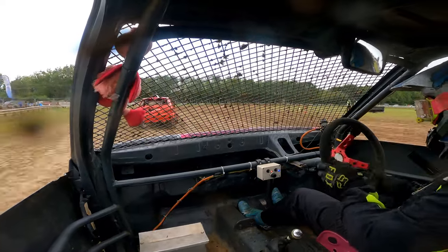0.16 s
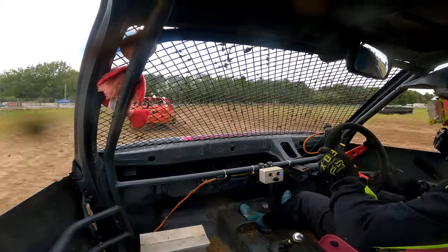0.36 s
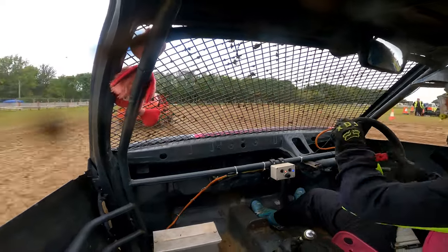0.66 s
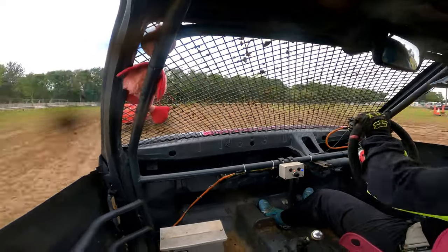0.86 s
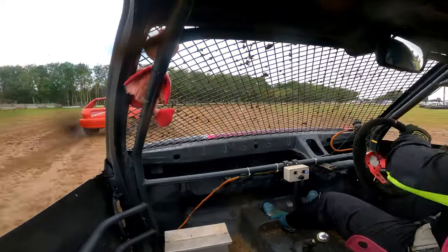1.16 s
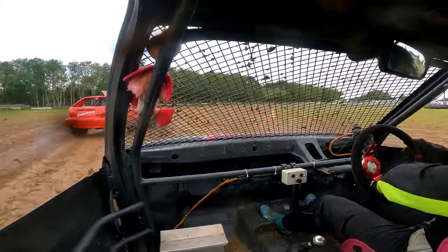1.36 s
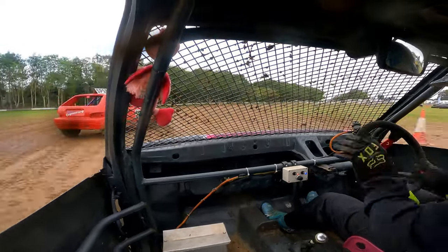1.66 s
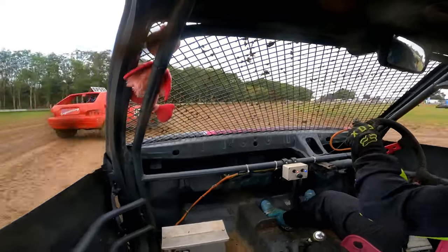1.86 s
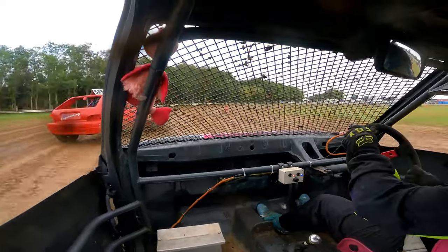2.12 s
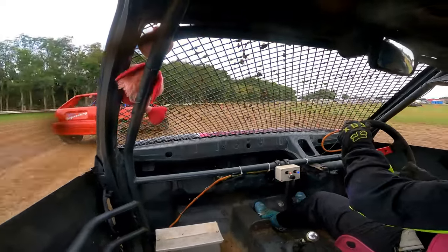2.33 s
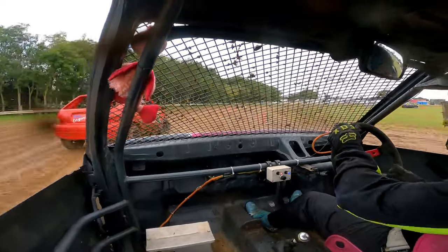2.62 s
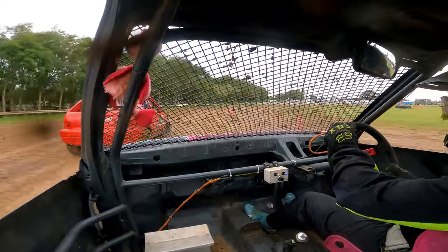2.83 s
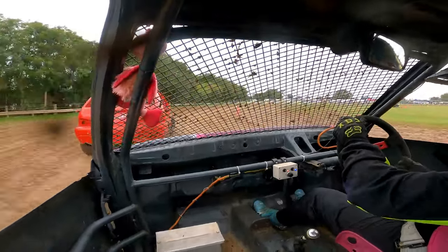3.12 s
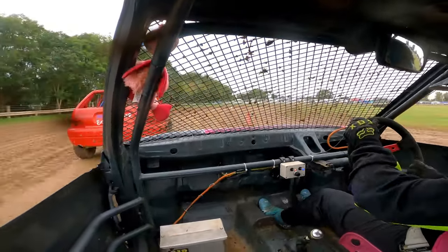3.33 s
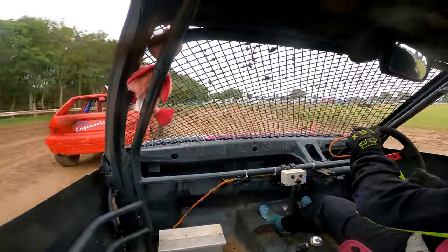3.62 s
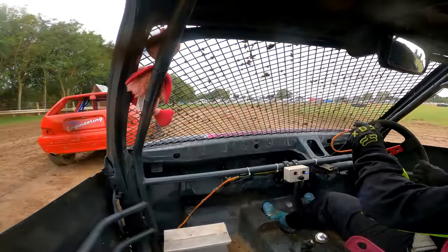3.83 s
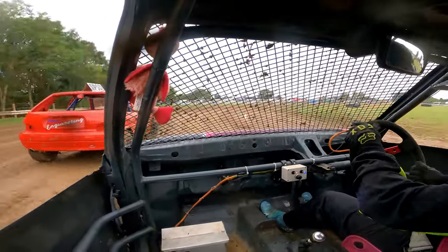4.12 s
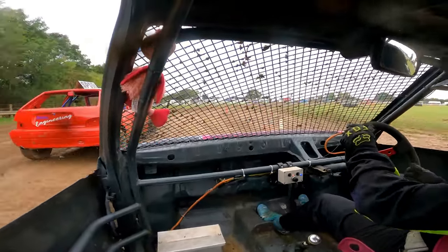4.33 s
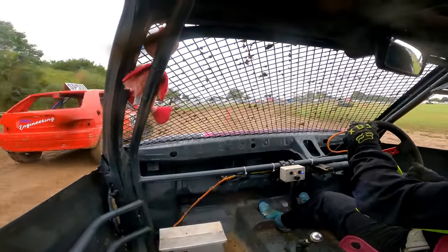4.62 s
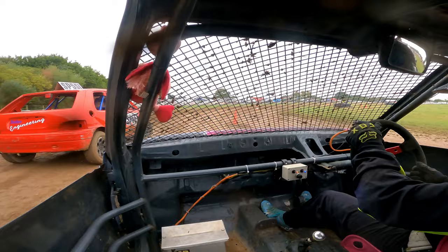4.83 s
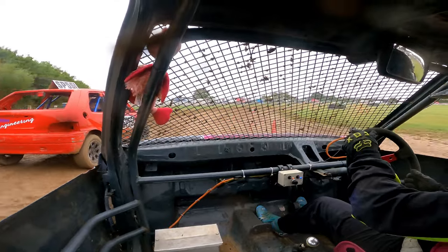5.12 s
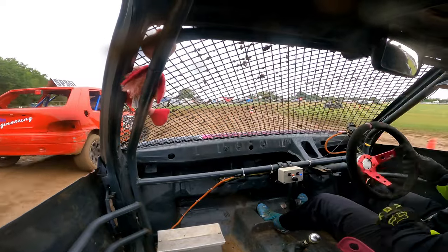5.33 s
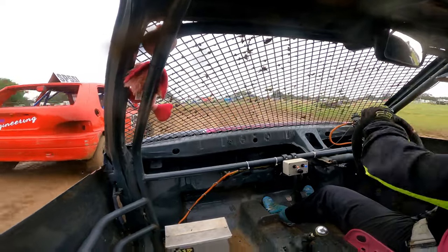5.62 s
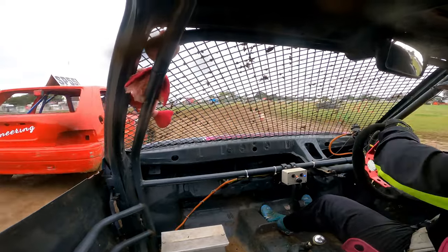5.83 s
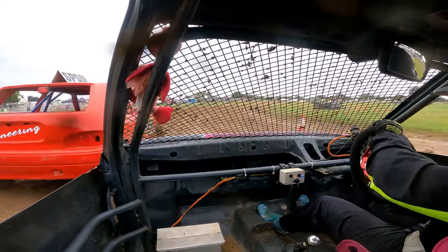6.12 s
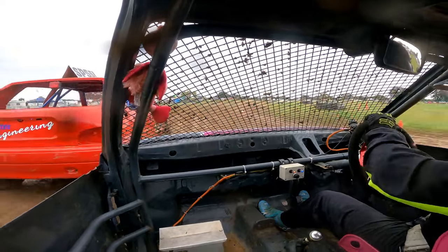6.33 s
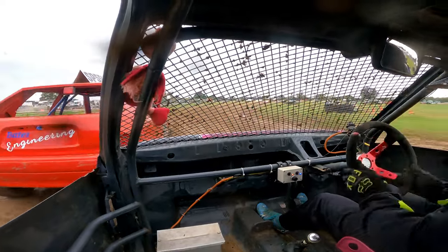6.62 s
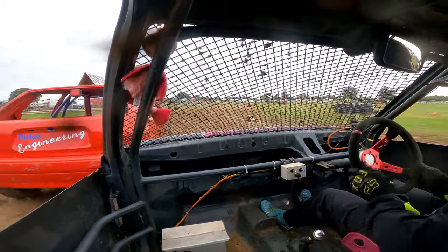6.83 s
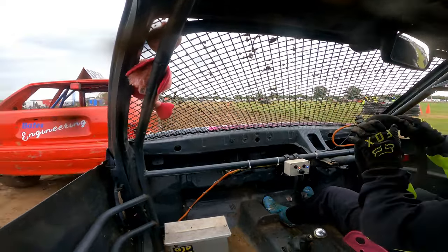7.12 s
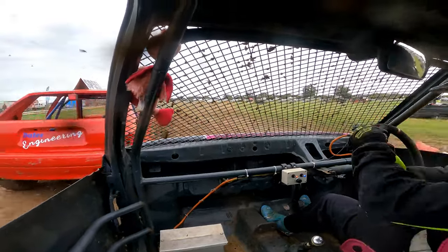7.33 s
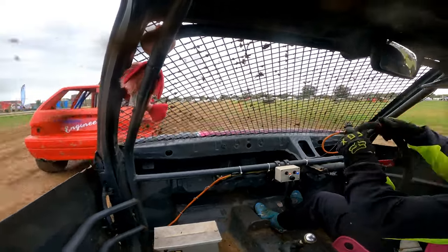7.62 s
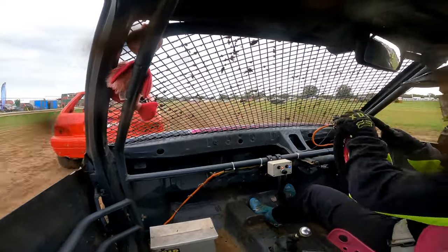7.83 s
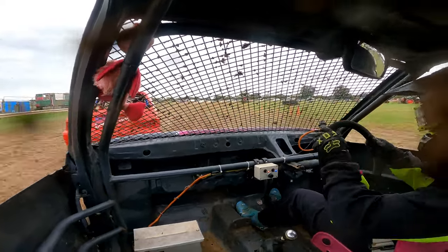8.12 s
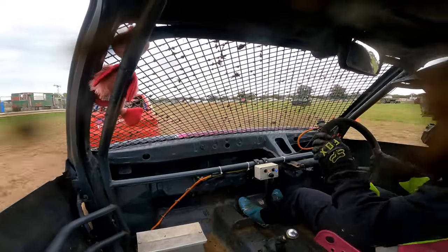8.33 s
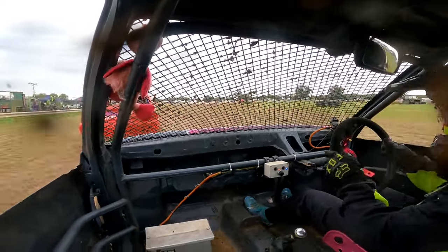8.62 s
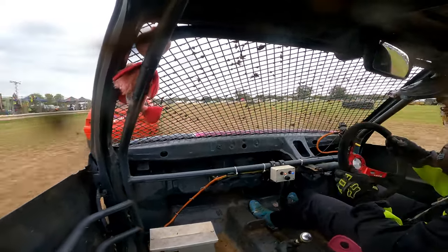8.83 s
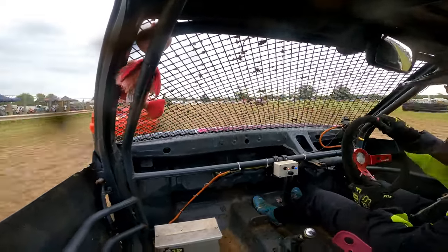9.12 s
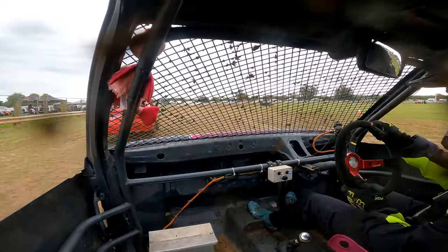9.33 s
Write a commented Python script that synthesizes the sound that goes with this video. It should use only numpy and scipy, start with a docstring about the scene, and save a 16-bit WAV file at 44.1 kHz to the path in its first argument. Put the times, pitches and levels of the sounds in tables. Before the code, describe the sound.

Heard from inside the bare cabin of a car racing on dirt, a loud engine drones and surges with only small changes in revs. The shell booms and the floor rumbles under a fast, irregular clatter close to the boxed-in microphone. Grit ticks and dirt hisses against the body. Thin panel tones and an on-and-off gear whine grow more present in the second half, with thicker grit near the end.

```python
"""Race car cockpit on a dirt oval

A stripped car at full throttle, heard by a small microphone in a closed housing on the cage.
The engine fires roughly into the bare shell, which booms; ruts shake the body, loose panels rattle and
sing, the gears whine and flying grit ticks on the metal. A gain control evens out the swells and the
peaks are rounded."""
import sys
import numpy as np
from scipy import signal
from scipy.fft import rfft, irfft, next_fast_len
from scipy.io import wavfile
from scipy.ndimage import uniform_filter1d

SR = 44100
rng = np.random.default_rng(int(sys.argv[2]) if len(sys.argv) > 2 else 0)


def materialize(psi):
    """Save the field psi as 16-bit PCM at rate SR to the path in sys.argv[1].

    A 1-D psi becomes a single channel; in a 2-D psi each row is a channel.
    """
    bounded = np.clip(np.atleast_2d(psi).T, -1, 1)
    quanta = np.round(bounded * 32767).astype(np.int16)
    wavfile.write(sys.argv[1], SR, quanta)


N = 417186
TIME = np.arange(N) / SR

# How rough the track is. Each row: time in seconds, usual rattle level in dB, dirt spray level in dB.
TRACK_SURFACE = [(0, -18.5, -42.5), (.4, -21, -43.5), (.95, -11.5, -42.5), (1.4, -35.5, -47),
                 (2.03, -16, -42), (2.3, -33, -47.5), (2.9, -30, -45.5), (3.5, -18.5, -45),
                 (4.4, -36, -45.5), (4.55, -5, -44.5), (4.75, -30, -47), (5.0, -18.5, -45),
                 (5.5, -24.5, -47.5), (6.0, -13, -44), (6.45, -28, -47), (6.9, -6.5, -42),
                 (7.5, -22.5, -41.5), (8.2, -25, -43.5), (8.85, -17.5, -43.5), (9.46, -31, -42)]
# The airy hiss of dust on metal. Each row: frequency in Hz, relative level in dB.
DUST_SPECTRUM = [(5000, -14.5), (7000, -1.5), (8500, -2.5), (10000, -7.5), (12000, -16), (15000, -30)]


def engine():
    """The firing tone trembles and surges over a low growl; the roar above puffs with every firing."""
    # The revs. Each row: time in seconds, firings per second, tone level in dB.
    revs = [(0, 202, -15.5), (.25, 180, -16.5), (.42, 179, -11), (1.0, 179, -18.5), (1.3, 181, -14.5),
            (1.7, 165, -12), (2.05, 161, -29), (2.22, 164, -12.5), (2.5, 171, -8.5), (2.9, 184, -18),
            (3.2, 177, -15), (3.6, 184, -13), (3.95, 193, -16), (4.45, 177, -17), (4.75, 183, -15.5),
            (5.1, 186, -14.5), (5.35, 211, -22), (5.7, 177, -10.5), (6.1, 191, -20), (6.55, 187, -12.5),
            (7.2, 192, -18), (7.6, 203, -14), (7.8, 186, -20), (8.05, 176, -16), (8.4, 183, -15.5),
            (8.7, 189, -17), (9.1, 186, -15.5), (9.46, 195, -19.5)]
    # The growl's fader moves. Each row: time in seconds, level in dB.
    growl_levels = [(0, -26.5), (.5, -29), (1.2, -24), (1.4, -28), (1.9, -24), (2.5, -28.5), (3.0, -25),
                    (3.8, -26.5), (4.5, -25.5), (5.5, -27), (6.5, -27.5), (7.15, -22), (7.6, -26.5),
                    (8.2, -28), (8.7, -24), (9.46, -31)]
    # The growl's low-mid body. Each row: frequency in Hz, relative level in dB.
    growl_spectrum = [(200, -7), (260, -0.5), (340, -6), (450, -2), (570, 0), (700, -4.5), (820, -10),
                      (950, -18)]
    # Engine and wind roar through the housing. Each row: frequency in Hz, relative level in dB.
    roar_spectrum = [(600, -31), (800, -11.5), (1000, 0), (1420, -3.5), (1520, -13), (2000, -21.5),
                     (3000, -37), (7000, -58.5), (9500, -71), (12000, -86)]
    firing_hz, tone_db = in_time(revs)
    phase = 2 * np.pi * np.cumsum(firing_hz + 4.54 * drift(14.02) + 3.996 * drift(3.978)) / SR
    tone = from_db(tone_db + 2.6 * drift(16)) * np.sin(phase)
    roar_db = -25.5 + 1.7 * np.cos(phase) + 1.2 * drift(19) + 1.4 * drift(27)
    growl_db = in_time(growl_levels)[0] - 2 + 1.3 * drift(7) + 2.4 * drift(20)
    growl = from_db(growl_db) * coloured(growl_spectrum)
    return tone + growl + from_db(roar_db) * coloured(roar_spectrum)


def shell_boom():
    """The bare shell booms in its lowest mode, trembling in pitch and strength."""
    # The boom. Each row: time in seconds, pitch in Hz, level in dB.
    boom = [(0, 46.21, -19), (.55, 43.91, -18.5), (1.2, 38.08, -14), (1.55, 44.58, -18.5),
            (2.0, 39.02, -15), (2.3, 41, -17.5), (3.2, 37.79, -15), (4.0, 39.68, -13), (4.7, 38.86, -16.5),
            (5.1, 37.36, -15.5), (5.6, 40.62, -18), (6.05, 38.09, -16), (6.45, 41.77, -23.5),
            (7.1, 34.92, -16), (7.55, 34.3, -20), (7.8, 35.03, -16), (8.2, 35.46, -23.5),
            (9.2, 36.77, -18.5), (9.46, 39.2, -36)]
    hz, db = in_time(boom)
    phase = 2 * np.pi * np.cumsum(hz + 2.25 * drift(2.975) + 5.02 * drift(25)) / SR
    return from_db(db) * rms_one(from_db(2.5 * drift(14)) * np.sin(phase))


def rut_rumble():
    """Ruts rumble up through the floor."""
    # The rumble's fader moves. Each row: time in seconds, level in dB.
    levels = [(0, -13.5), (.8, -14), (2.0, -14), (3.2, -14), (4.2, -13.5), (5.5, -14), (6.5, -14),
              (7.15, -12.5), (7.7, -13), (8.3, -15), (8.8, -13.5), (9.46, -15.5)]
    # Its bass weight. Each row: frequency in Hz, relative level in dB.
    spectrum = [(15, -11.5), (28, -8), (60, -2), (110, -2), (150, 1), (185, -0.5), (215, -4.5), (250, -13),
                (340, -22.5), (600, -24.5)]
    return from_db(in_time(levels)[0] + 0.25 * drift(4.1)) * coloured(spectrum)


def loose_rattle():
    """A loose part bounces at an uneven rate; every knock thuds and rings the housing."""
    # The hardest knocks. Each row: time in seconds, strength in dB, ring focus in Hz.
    hard_knocks = [(0.024, -12.5, 1050), (0.395, -16.5, 1040), (0.476, -16, 1030), (0.599, -14.5, 982),
                   (0.639, -13, 982), (0.667, -14, 1090), (0.745, -11, 1052), (0.778, -10, 1080),
                   (0.794, -9.5, 913), (0.845, -11, 915), (0.911, -8.5, 1040), (0.941, -14, 960),
                   (0.959, -21, 1048), (1.022, -13, 982), (1.044, -10, 1096), (1.078, -8.5, 1056),
                   (1.195, -11, 1020), (1.208, -9, 1080), (1.224, -8, 1020), (1.236, -12, 958),
                   (1.289, -17, 1010), (1.326, -13.5, 903), (1.491, -13, 902), (1.514, -13, 1200),
                   (1.598, -9, 952), (1.625, -9, 1085), (1.649, -11, 1150), (1.695, -15, 1050),
                   (1.712, -14, 934), (1.74, -9.5, 1097), (1.76, -8, 1040), (1.849, -13.5, 1110),
                   (1.905, -14, 912), (1.916, -13, 872), (1.926, -16, 1050), (1.939, -10.5, 1090),
                   (1.962, -9, 1047), (1.992, -10, 1040), (2.005, -10, 1030), (2.02, -8, 1030),
                   (2.031, -5.5, 1110), (2.059, -8.5, 1160), (2.08, -14, 940), (2.091, -9.5, 996),
                   (2.105, -9, 990), (2.124, -15, 1203), (2.138, -13, 1030), (2.207, -16, 885),
                   (2.4, -25, 1180), (2.482, -10.5, 999), (2.562, -9, 1010), (2.638, -8, 1020),
                   (2.723, -10, 977), (2.739, -8, 1113), (2.846, -12, 1037), (2.86, -9, 1080),
                   (2.949, -19, 1100), (2.977, -11.5, 1130), (3.048, -13, 1020), (3.065, -11.5, 1060),
                   (3.096, -16, 1110), (3.121, -6, 1062), (3.189, -12.5, 999), (3.227, -11, 1042),
                   (3.243, -10, 1000), (3.264, -15, 899), (3.337, -11.5, 993), (3.359, -10, 1100),
                   (3.384, -8.5, 945), (3.439, -21, 1090), (3.467, -11, 1040), (3.477, -11, 1110),
                   (3.494, -8, 1120), (3.508, -12, 1130), (3.525, -7, 1000), (3.54, -16, 985),
                   (3.554, -16, 1057), (3.581, -13, 912), (3.613, -18, 1022), (3.628, -12, 1056),
                   (3.644, -6.5, 1080), (3.656, -7, 988), (3.685, -8.5, 1020), (3.802, -15.5, 1200),
                   (3.843, -10.5, 1060), (3.971, -14, 1030), (4.021, -14.5, 1080), (4.064, -14, 996),
                   (4.081, -19, 1000), (4.1, -11.5, 934), (4.126, -10, 1118), (4.148, -17, 1040),
                   (4.173, -13, 1120), (4.204, -9, 1025), (4.248, -13, 996), (4.279, -12, 1090),
                   (4.333, -11, 1020), (4.362, -9, 1100), (4.458, -19, 1210), (4.474, -14, 1088),
                   (4.487, -8.5, 1038), (4.504, -9, 1055), (4.53, -10, 990), (4.604, -9, 1030),
                   (4.614, -9, 1110), (4.689, -13, 1060), (4.78, -21, 1110), (4.876, -5, 1005),
                   (4.888, -10, 956), (4.906, -11, 1060), (5.003, -13, 979), (5.057, -10, 1080),
                   (5.068, -12, 944), (5.084, -7.5, 1050), (5.239, -19, 1170), (5.298, -21, 1060),
                   (5.334, -16, 1246), (5.527, -14, 980.6), (5.606, -16, 1040), (5.727, -14.5, 1097),
                   (5.784, -9, 991), (5.856, -13, 961), (5.88, -13, 1099), (6.008, -11, 1159),
                   (6.038, -6.5, 1039), (6.052, -10, 953), (6.068, -13, 1063), (6.099, -12, 1075),
                   (6.18, -20.5, 1040), (6.238, -16, 1154), (6.289, -14.5, 1040), (6.662, -12, 1110),
                   (6.717, -11, 1140), (6.771, -8, 1190), (6.795, -11, 941), (6.86, -18, 1042),
                   (6.933, -11, 920), (6.984, -5, 1102), (7.007, -10.5, 1030), (7.096, -6, 1048),
                   (7.127, -11, 922), (7.154, -11, 1051), (7.25, -11, 1060), (7.356, -10, 1090),
                   (7.414, -15, 931), (7.517, -9, 1166), (7.628, -12, 969), (7.725, -5, 1080),
                   (7.753, -5.5, 1110), (7.784, -11, 998), (7.795, -10.5, 1100), (7.856, -11, 982),
                   (7.897, -14, 1195), (7.952, -9, 898), (7.965, -10, 1160), (8.0, -18, 1240),
                   (8.076, -13, 992), (8.292, -16, 988), (8.327, -16, 1247), (8.47, -18, 1246),
                   (8.541, -16, 1230), (8.608, -9, 892.5), (8.677, -10.5, 1184), (8.701, -10, 1157),
                   (8.711, -12, 1006), (8.734, -9, 1090), (8.745, -12, 1202), (8.773, -10, 1040),
                   (8.995, -12, 1072), (9.033, -12.5, 1010), (9.276, -9, 1026), (9.287, -10, 880)]
    # The housing's modes. Each row: pitch in Hz, relative level in dB, seconds to fade by 60 dB.
    housing_modes = [(970, -7, 0.09), (1004, -6.5, 0.026), (1054, -2.5, 0.019), (1105, -6, 0.022),
                     (1206, -5, 0.024), (1210, -4.5, 0.057), (1720, 10, 0.034), (2260, 10.5, .01),
                     (3150, 19.5, .015)]
    bounces_per_s, clearance_s, bounce_cap_db = 72, .011, -15
    hard_s, hard_db, hard_hz = np.transpose(hard_knocks)
    bounce_count = np.cumsum(bounces_per_s * from_db(3 * drift(30) + 2.5 * drift(5))) / SR
    bounces = np.flatnonzero(np.diff(np.floor(bounce_count)))
    gap_s = np.abs(bounces[:, None] / SR - hard_s).min(axis=1)
    bounces = bounces[gap_s > clearance_s]   # leave room around each hard knock
    bounce_hz = 1016 * np.exp(.07 * rng.standard_normal(N)[bounces])
    bounce_db = in_time(TRACK_SURFACE)[0] + 0.92 * drift(7.2) + 2.8 * rng.standard_normal(N)
    at = np.r_[bounces, (hard_s * SR).astype(int)]
    db = np.r_[np.minimum(bounce_db[bounces], bounce_cap_db), hard_db]
    hz = np.r_[bounce_hz, hard_hz]
    ring = strike(at, db - 8.5, housing_modes, focus_hz=hz, fall_db=27, rise_db=27, spread_db=5.5)
    mount = signal.butter(1, [820, 1500], "band", fs=SR, output="sos")   # passes the ring on softly
    return signal.sosfilt(mount, ring) + thuds(at, db - 1.5, hz)


def thuds(at, db, hz, rise_s=.0014):
    """Each knock is a few cycles that swell and die within milliseconds."""
    t = np.arange(700) / SR
    burst = t / rise_s * np.exp(1 - t / rise_s) * np.sin(2 * np.pi * hz[:, None] * t)
    out = np.zeros(N + len(t))
    np.add.at(out, at[:, None] + np.arange(len(t)), from_db(db)[:, None] * burst)
    return out[:N]


def floor_pan():
    """The shaken floor pan sings on one note."""
    # The note's fader moves. Each row: time in seconds, level in dB.
    levels = [(0, -32.5), (.3, -31), (1.0, -37.5), (2.5, -42), (2.75, -29), (3.0, -31), (3.3, -40),
              (3.75, -26), (4.3, -29.5), (4.7, -27), (6.0, -25.5), (6.7, -27), (6.9, -33), (7.3, -27.5),
              (7.7, -38.5), (8.0, -29.5), (9.46, -43)]
    return from_db(in_time(levels)[0] + 0.83 * drift(6.1)) * singing(576.2, width_hz=20, steady=.59)


def door_skin():
    """The shaken door skin sings, its note gliding as the body twists."""
    # The door's note. Each row: time in seconds, pitch in Hz, level in dB.
    glide = [(0, 1633, -31.5), (.3, 1667, -39), (.6, 1701, -34.5), (.73, 1676, -45), (.85, 1744, -34),
             (1.0, 1665, -37), (1.15, 1715, -32), (1.3, 1625, -43), (1.42, 1700, -39), (1.5, 1657, -52),
             (1.6, 1663, -48), (2.15, 1658, -47.5), (2.55, 1667, -55), (2.63, 1682, -31.5),
             (2.72, 1673, -42), (2.78, 1703, -48), (2.85, 1659, -32), (3.05, 1677, -40), (3.25, 1644, -45),
             (4.3, 1642, -54), (4.45, 1665, -37), (4.65, 1643, -50), (4.78, 1636, -31.5), (4.95, 1596, -39),
             (5.35, 1600, -34), (5.5, 1634, -34), (5.77, 1655, -28), (5.87, 1670, -37.5),
             (6.01, 1654, -23.5), (6.12, 1593, -38), (6.3, 1655, -32.5), (6.6, 1695, -31.5),
             (6.72, 1683, -42), (6.85, 1670, -32.5), (7.08, 1732, -35.5), (7.3, 1659, -38),
             (7.5, 1667, -36), (7.61, 1668, -30), (7.7, 1677, -42.5), (8.4, 1640, -41), (8.54, 1630, -29.5),
             (8.93, 1665, -38), (9.05, 1664, -27), (9.14, 1647, -27), (9.3, 1650, -40), (9.4, 1738, -31.5),
             (9.46, 1715, -24)]
    hz, db = in_time(glide)
    return from_db(db + drift(9)) * singing(hz, width_hz=36, steady=.85)


def gear_whine():
    """Meshing teeth make a rough tone that comes and goes with the load on the wheels."""
    # Spells under load. Each row: start in seconds, length in seconds, pitch in Hz, level in dB.
    under_load = [(.245, 0.02, 1430, -23), (.36, 0.29, 1435, -32), (.74, 0.084, 1395, -23.5),
                  (2.1, 0.56, 1400, -49), (2.75, 0.17, 1375, -47), (3.1, 0.44, 1355, -38.5),
                  (4.8, .2, 1324, -29.5), (5.1, 0.24, 1291, -28), (5.5, 0.16, 1351, -29.5),
                  (5.75, 0.2, 1410, -28), (5.95, 0.095, 1385, -30), (6.43, 0.16, 1393, -28),
                  (6.73, 0.066, 1430, -22.5), (7.03, 0.078, 1432, -26.5), (7.45, 0.31, 1276, -29.5),
                  (7.9, 0.27, 1295, -28), (8.1, 0.23, 1435, -30), (8.4, 0.17, 1255, -26.5),
                  (8.7, 0.12, 1280, -27.5), (8.95, .1, 1394, -30.5), (9.12, 0.17, 1454, -27),
                  (9.35, 0.11, 1419, -31)]
    hz, gain = spells(under_load)
    return gain * from_db(0.84 * drift(16)) * singing(hz + 14 * drift(5), width_hz=40, steady=.69)


def panel_drone():
    """A narrow panel tone swells once near the end."""
    # The swell. Its row: start in seconds, length in seconds, pitch in Hz, level in dB.
    swell = [(9.2, 0.22, 893, -30)]
    hz, gain = spells(swell)
    return gain * singing(hz, width_hz=5.3, steady=.9)


def flying_grit():
    """Stones crack on sheet metal and scatter weaker chips; fine grains tick, and a few hit fittings."""
    # Stone hits. Each row: time in seconds, strength in dB, focus in Hz, fall above it in dB per octave.
    stones = [(0.073, -45, 4500, 20), (0.1007, -52, 7500, 8), (0.1751, -54, 6300, 2),
              (0.1901, -52, 8900, -3), (0.2025, -56, 7500, 12), (0.2438, -43, 5300, 12),
              (0.3033, -39, 6300, 18), (0.3532, -41, 4500, -9), (0.3672, -61, 7500, 15),
              (0.3876, -52, 8900, 6), (0.4355, -43, 4500, 3), (0.6375, -41, 4500, 3),
              (0.667, -20, 3800, 14), (0.7502, -48, 5300, 14), (0.8326, -25, 1900, 12),
              (0.9088, -46, 4500, 11), (1.078, -30, 2700, 28), (1.102, -35, 3800, 37),
              (1.2083, -25, 2300, 29), (1.2237, -35, 2700, 20), (1.2387, -23, 2700, 21),
              (1.2531, -46, 5300, 33), (1.5789, -24.5, 3200, 24), (1.7165, -48, 5300, 21),
              (1.9625, -43, 5300, 37), (2.0309, -31, 2700, 27), (2.0703, -47, 4500, 28),
              (2.0912, -24, 3200, 37), (2.1247, -45, 3800, 20), (2.3212, -38, 2700, 21),
              (2.5208, -24, 3800, 34), (2.7378, -40, 3200, 20), (2.8555, -29, 2300, 16),
              (2.9398, -41, 5300, 37), (3.0481, -35, 2700, 36), (3.1054, -22, 2700, 35),
              (3.1209, -44, 5300, 38), (3.3514, -33, 1900, 20), (3.3828, -32, 2700, 25),
              (3.5075, -20, 2700, 24), (3.524, -35, 3200, 25), (3.541, -46, 4500, 16.5),
              (3.6278, -29, 2700, 28), (3.6437, -35, 3200, 24.5), (3.6572, -26, 2700, 24),
              (3.8014, -53, 6300, 32), (4.0089, -38, 2700, 13), (4.0987, -22, 2700, 32),
              (4.1865, -24, 3200, 42), (4.2039, -35, 3200, 30), (4.2783, -39, 4500, 41),
              (4.3616, -49, 5300, 38), (4.4828, -23, 1900, 24), (4.6155, -22, 2700, 43),
              (4.631, -54, 6300, 12), (4.8904, -25, 3200, 40), (4.9058, -34, 3200, 23),
              (5.068, -35, 3800, 40), (5.0834, -27, 3200, 22), (5.6896, -34, 4500, 35),
              (5.8552, -59, 7500, 19), (7.0944, -54, 4500, 12), (7.1112, -48, 5300, 10),
              (7.2001, -23, 2700, 33), (7.5189, -12.5, 1900, 12), (7.5379, -34, 2300, 8),
              (7.6381, -31, 5300, 38), (7.6895, -40, 6300, 39), (7.7224, -30, 3800, 13),
              (7.7344, -29, 3800, 17), (7.7524, -26, 3200, 17), (7.7878, -55, 8900, 38),
              (7.797, -42, 3800, 13), (7.8715, -52, 6300, 14), (7.912, -48, 8900, 38), (7.94, -24, 3800, 7),
              (7.9729, -44, 3800, 5), (8.0077, -54, 6300, 6), (8.2642, -59, 7500, 20),
              (8.6124, -37, 4500, 2), (8.7137, -24, 3200, 29), (8.7471, -28, 2700, 12),
              (8.779, -55, 8900, 31), (8.8942, -57, 6300, 16), (9.0135, -23, 3200, 17),
              (9.2065, -56, 6300, 12)]
    # The density of fine grit. Each row: time in seconds, grains per second.
    grain_rates = [(0, 760), (.9, 550), (1.3, 85.5), (6.6, 76), (7.4, 240), (8.9, 420), (9.46, 156)]
    # The sheet metal's modes. Each row: pitch in Hz, relative level in dB, seconds to fade by 60 dB.
    sheet_modes = [(1860, -7.5, 0.014), (2400, -7.5, 0.013), (2900, -8, 0.009), (3400, -10, .007),
                   (3930, -8, 0.0065), (4350, -13, 0.0067), (4900, -10, 0.0095), (5500, -11, 0.004),
                   (6200, -10.5, 0.0061), (6700, -10, 0.0077), (7800, -11, 0.0058), (8800, -13, 0.005),
                   (10200, -15.5, .004), (12000, -18.5, .003), (14000, -21, .003)]
    strays_per_s, hits_per_stone, scatter_s, scatter_loss_db, ping_share = 2, 6, .0044, 9, .06
    stray_s = np.flatnonzero(rng.random(N) < strays_per_s / SR) / SR
    strays = [(s, -43 + 2.2 * rng.standard_normal(), 2900, 24.5) for s in stray_s]
    stone_s, stone_db, stone_hz, stone_fall_db = np.repeat(list(stones) + strays, hits_per_stone, 0).T
    is_chip = np.arange(len(stone_s)) % hits_per_stone > 0
    lag = rng.random(len(stone_s)) * is_chip
    hits = np.minimum(((stone_s + scatter_s * lag ** 2) * SR).astype(int), N - 1)
    hit_db = stone_db - scatter_loss_db * np.sqrt(lag)
    luck, grain_chance = rng.random(N), in_time(grain_rates)[0] / SR
    grains = np.flatnonzero(luck < grain_chance)
    grain_db = -58 + 3.6 * np.minimum(rng.exponential(1, N), 4)[grains]
    focus_hz = np.r_[stone_hz, np.full(len(grains), 3500)]
    fall_db = np.r_[stone_fall_db, np.full(len(grains), 14)]
    ticks = strike(np.r_[hits, grains], np.r_[hit_db, grain_db], sheet_modes, focus_hz, fall_db,
                   rise_db=16.5, spread_db=5.5)
    return ticks + dirt_splash(ticks) + fitting_pings(np.flatnonzero(luck < ping_share * grain_chance))


def fitting_pings(grains):
    """Small loose fittings ping when grit finds them: a few clear hits among faint random ones."""
    # The fittings. Each row: pitch in Hz, relative level in dB, seconds to fade by 60 dB.
    fittings = [(3370, 0.5, .03), (3630, -2, 0.018), (3860, -5, .03), (4750, -14, 0.022),
                (5200, -16.5, .025), (6800, -14, .04)]
    # The clearest pings. Each row: time in seconds, strength in dB, ring focus in Hz.
    accents = [(.255, -38, 5100), (.345, -34, 6800), (.575, -33, 3544), (.59, -41.5, 6800),
               (4.098, -33, 4760), (6.9, -39, 3600), (7.178, -35, 3600), (7.35, -39, 3953),
               (7.618, -28, 4900), (7.628, -27, 3393), (7.674, -34, 6800), (7.69, -33, 6800),
               (7.687, -32.5, 3370), (8.008, -40, 5200), (8.283, -36, 3593), (8.572, -34, 3500),
               (8.626, -44, 6800), (8.645, -33, 3950), (8.778, -38, 3960), (8.893, -46, 6800)]
    s, db, hz = np.transpose(accents)
    clear = strike((s * SR).astype(int), db, fittings, focus_hz=hz, fall_db=42, rise_db=42, spread_db=0)
    return clear + strike(grains, -51, fittings, spread_db=7.5)


def dirt_spray(rattle):
    """Dirt hisses on the body in gusts; every knock shakes an extra burst out of the panels."""
    # The spray's bite. Each row: frequency in Hz, relative level in dB.
    spectrum = [(1200, -11.5), (1900, 3.5), (2700, -4.5), (3500, -5.5), (4500, -20.5), (5300, -20),
                (6300, -29.5), (6900, -29.5), (8000, -44.5), (12000, -60.5)]
    bursts = 1 + 8.8 * np.sqrt(np.abs(uniform_filter1d(rattle ** 2, size=90)))
    gust_db = in_time(TRACK_SURFACE)[1] + 2.2 * drift(18) + 1.8 * drift(22)
    return from_db(gust_db) * bursts * coloured(spectrum)


def dirt_splash(ticks, tail_s=.008):
    """The dirt that comes with a stone hisses after it, following the top end of each tick."""
    treble = signal.sosfilt(signal.butter(2, 6000, "high", fs=SR, output="sos"), ticks)
    fade = np.exp(-1 / (tail_s * SR))
    envelope = np.sqrt(signal.lfilter([1 - fade], [1, -fade], treble ** 2))
    return from_db(-15) * envelope * coloured(DUST_SPECTRUM)


def fine_dust():
    """The finest dust brushes the body with a faint, flickering hiss."""
    # The dust's fader moves. Each row: time in seconds, level in dB.
    levels = [(0.0, -72), (0.29, -68), (0.45, -74.5), (0.89, -74), (1.13, -80), (1.29, -88), (1.74, -85),
              (2.32, -83), (2.85, -80), (3.87, -85.5), (5.66, -80), (5.95, -86), (6.46, -83), (6.9, -81),
              (7.51, -84.5), (7.67, -79), (7.88, -77), (8.03, -77), (8.93, -78), (9.46, -80)]
    return from_db(in_time(levels)[0] + 2.5 * drift(8) + 2.5 * drift(30)) * coloured(DUST_SPECTRUM)


def strike(at, db, modes, focus_hz=1000, fall_db=0, rise_db=0, spread_db=2):
    """Blows at samples `at` ring every mode, less by fall_db per octave above the focus, rise_db below."""
    out, luck = np.zeros(N), rng.standard_normal((len(at), len(modes)))
    for k, (hz, level_db, t60) in enumerate(modes):
        clicks, octaves = np.full(N, 1e-18), np.log2(hz / focus_hz)
        off_db = np.where(octaves > 0, fall_db * octaves, -rise_db * octaves)
        np.add.at(clicks, at, from_db(db + level_db - off_db + spread_db * luck[:, k]) * (-1) ** k)
        r, w = from_db(-60 / (t60 * SR)), 2 * np.pi * hz / SR
        soft = np.exp(-w)   # the contact lasts long enough to round off everything above the mode
        poles = np.convolve([1, -2 * r * np.cos(w), r * r], [1, -2 * soft, soft * soft])
        out += signal.lfilter([0, 2 * (1 - soft) ** 2 * np.sin(w)], poles, clicks)
    return out


def singing(hz, width_hz, steady):
    """Noise in a narrow resonance, with a share of steady tone; rms 1."""
    r = np.exp(-2 * np.pi * width_hz / SR)
    wobble = signal.lfilter([1], [1, -2 * r, r * r], rng.standard_normal((2, N)))
    wobble = steady + (wobble[0] + 1j * wobble[1]) / wobble.std()
    return rms_one(np.real(wobble * np.exp(2j * np.pi * np.cumsum(hz + np.zeros(N)) / SR)))


def spells(rows, swell_s=.03, fade_s=.13):
    """Pitch and gain of a tone that swells, holds and fades once for each row."""
    start, length, hz, db = np.transpose(rows)[:, :, None]
    t = TIME[::64]
    shape = np.clip(np.minimum((t - start) / swell_s + 1, (start + length - t) / fade_s + 1), 0, 1)
    current = np.maximum(np.searchsorted(start[:, 0] - swell_s, TIME) - 1, 0)
    return hz[current, 0], np.interp(TIME, t, np.max(from_db(db) * shape, axis=0))


def coloured(spectrum):
    """Noise with the given spectrum, falling away outside it; rms 1."""
    size = next_fast_len(N)
    hz, db = np.transpose([(5, -80)] + list(spectrum) + [(20000, -110)])
    gain = from_db(np.interp(np.log(np.arange(size // 2 + 1) * SR / size + 1), np.log(hz), db))
    return rms_one(irfft(rfft(rng.standard_normal(size)) * gain, size)[:N])


def drift(rate_hz):
    """A smooth random wander with a spread of 1: coarse noise, low-passed at rate_hz."""
    r = np.exp(-40 * np.pi * rate_hz / SR)
    slow = signal.lfilter([1], [1, -2 * r, r * r], rng.standard_normal(N // 20 + 4002))[4000:]
    return np.interp(np.arange(N) / 20, np.arange(len(slow)), rms_one(slow))


def in_time(rows):
    """Each column after a table's times as a curve over all samples."""
    s, *columns = np.transpose(rows)
    return [np.interp(TIME, s, c) for c in columns]


def from_db(db):
    """Decibels to gain."""
    return np.exp(np.asarray(db) * np.log(10) / 20)


def rms_one(x):
    """Scale to rms 1."""
    return x / np.sqrt(np.mean(x ** 2) + 1e-20)


def scene():
    """All sources at the one microphone."""
    car = engine() + shell_boom() + floor_pan() + door_skin() + panel_drone()
    rattle = loose_rattle()
    track = rattle + dirt_spray(rattle) + fine_dust() + rut_rumble()
    return (car + track + gear_whine() + flying_grit())[None]


def record(dry):
    """Subsonics are cut, a fast gain control evens out the swells, peaks are rounded, the top is cut."""
    threshold, ceiling, cutoff_hz = .28, .9, 15400
    edge_fade = np.minimum(1, np.minimum(TIME, TIME[::-1]) / .002)
    x = signal.sosfilt(signal.butter(2, 22, "high", fs=SR, output="sos"), dry * edge_fade)
    level = np.sqrt(uniform_filter1d(x ** 2, size=900) + 1e-9)
    x = x * np.minimum(1, (level / threshold) ** -.3)
    rounded = ceiling * np.tanh(x / ceiling)
    return signal.sosfilt(signal.cheby2(12, 70, cutoff_hz, fs=SR, output="sos"), rounded)


dry = scene()
out = record(dry)
materialize(out)
```